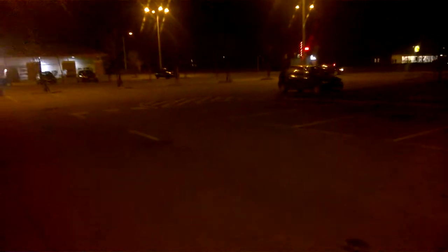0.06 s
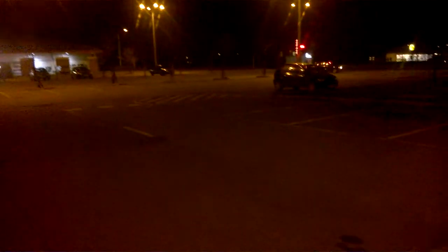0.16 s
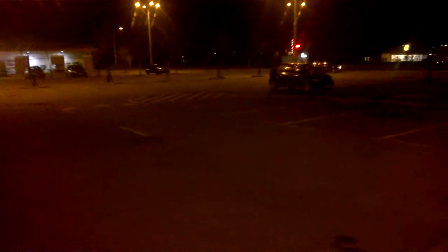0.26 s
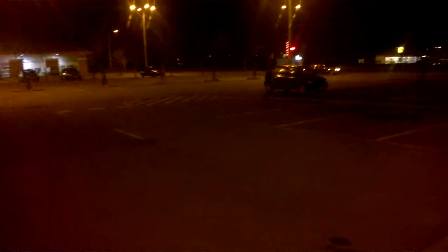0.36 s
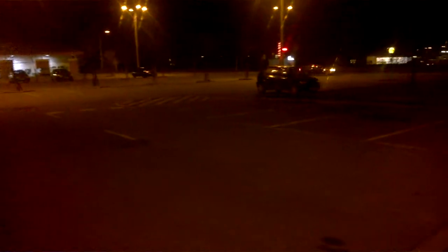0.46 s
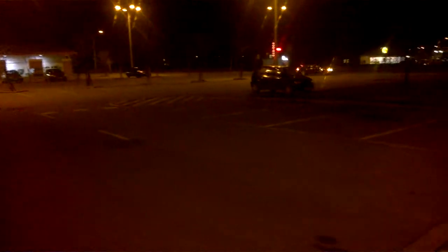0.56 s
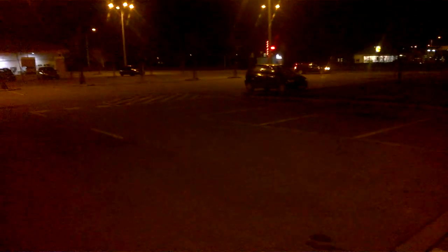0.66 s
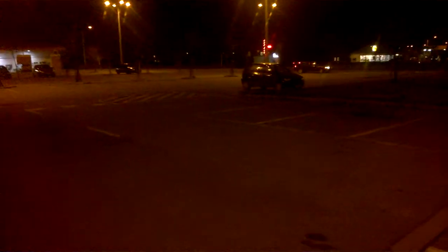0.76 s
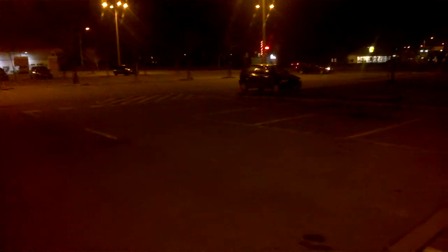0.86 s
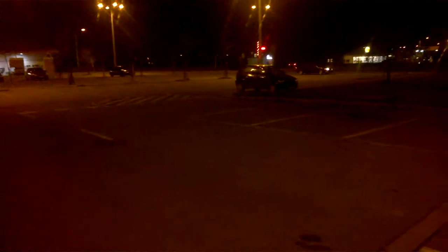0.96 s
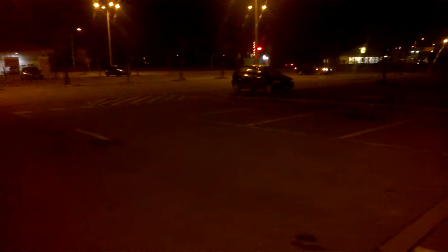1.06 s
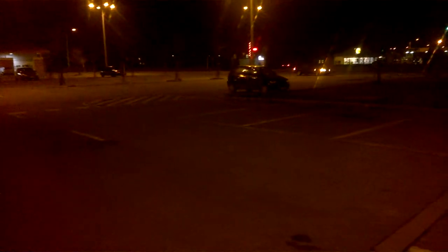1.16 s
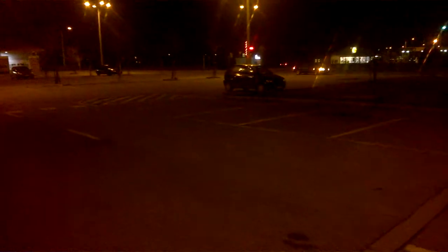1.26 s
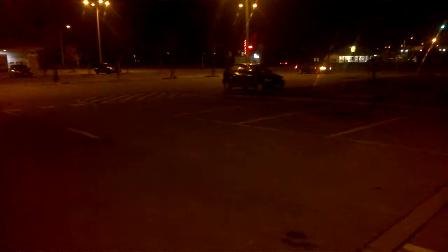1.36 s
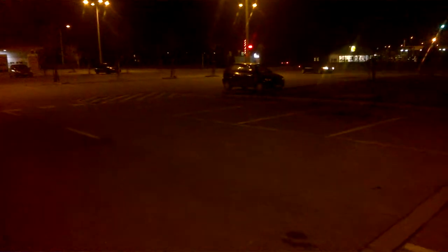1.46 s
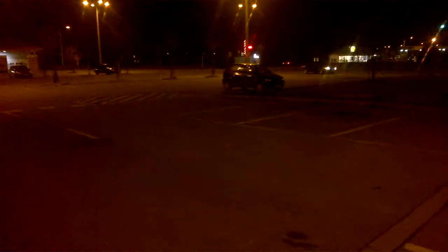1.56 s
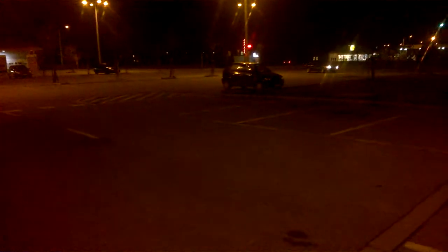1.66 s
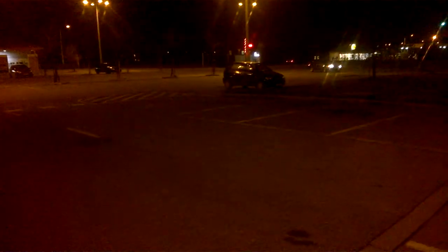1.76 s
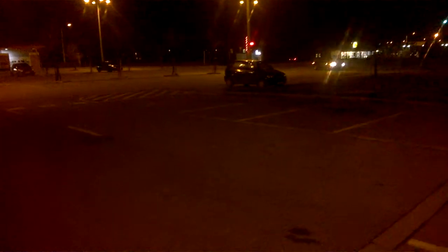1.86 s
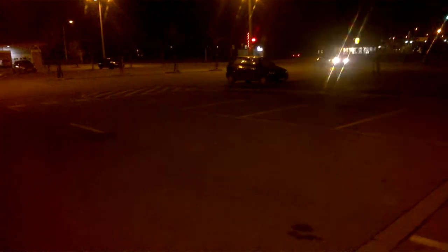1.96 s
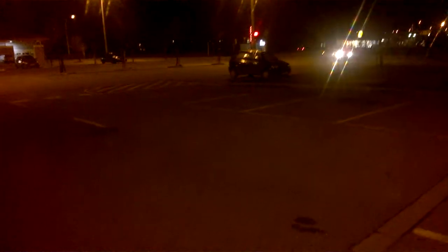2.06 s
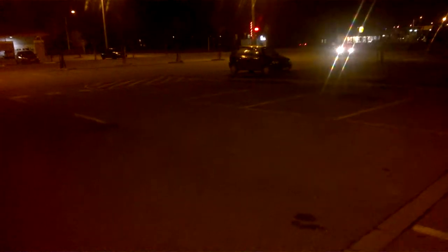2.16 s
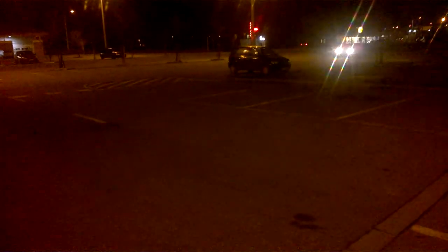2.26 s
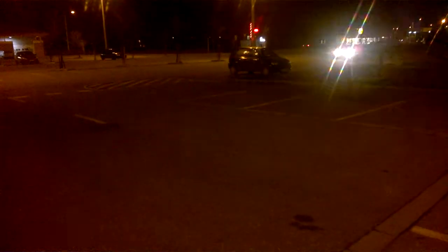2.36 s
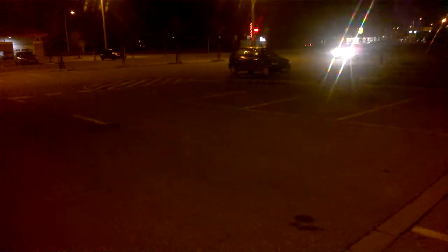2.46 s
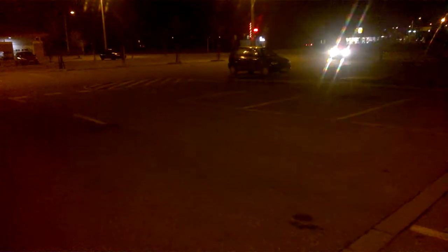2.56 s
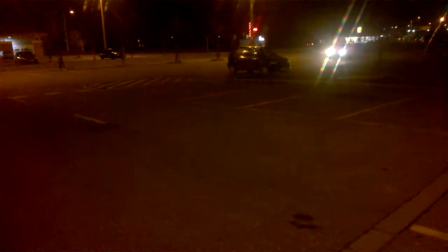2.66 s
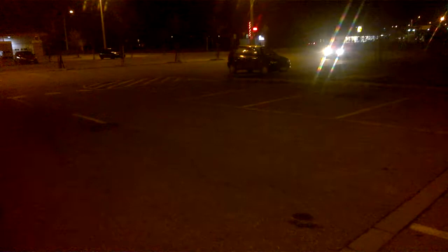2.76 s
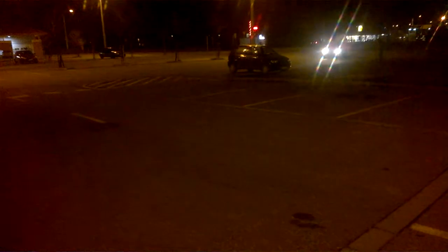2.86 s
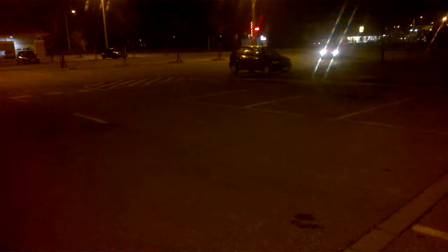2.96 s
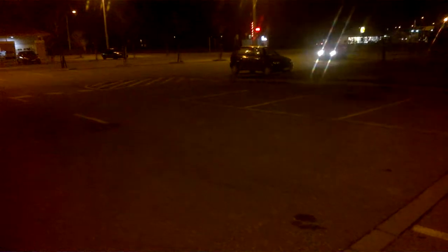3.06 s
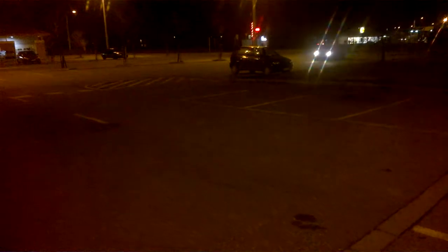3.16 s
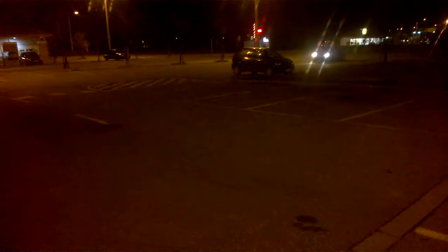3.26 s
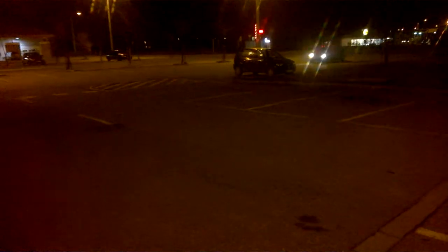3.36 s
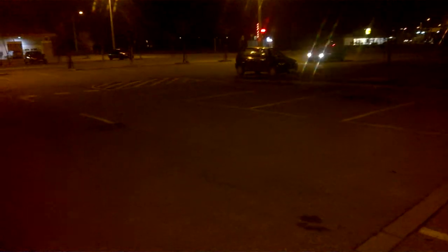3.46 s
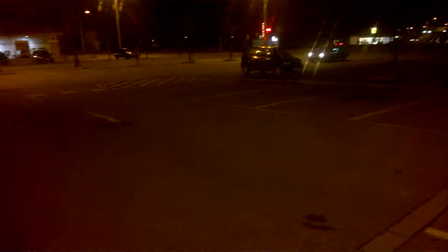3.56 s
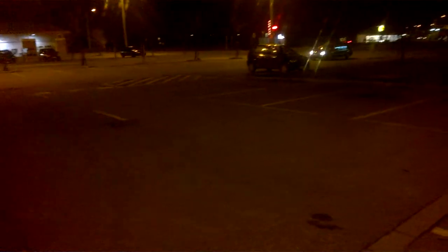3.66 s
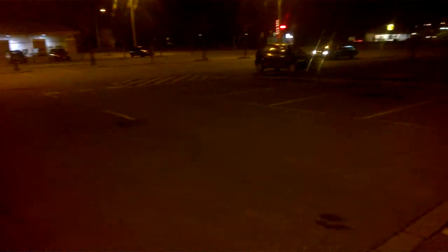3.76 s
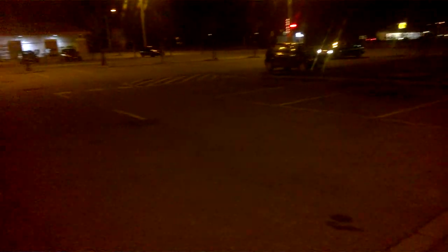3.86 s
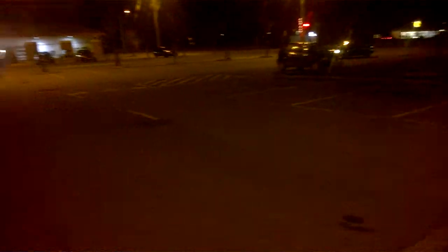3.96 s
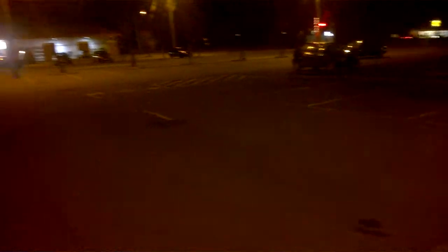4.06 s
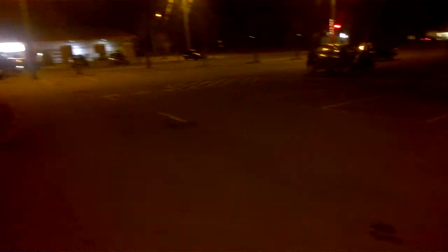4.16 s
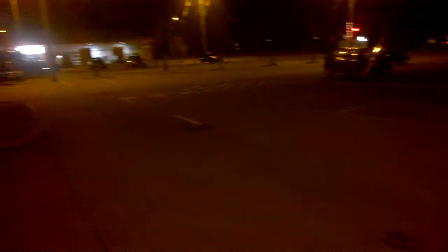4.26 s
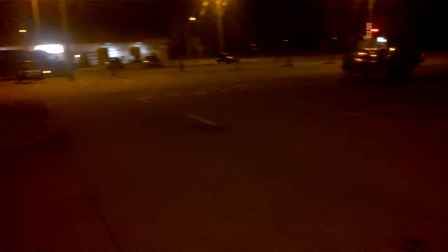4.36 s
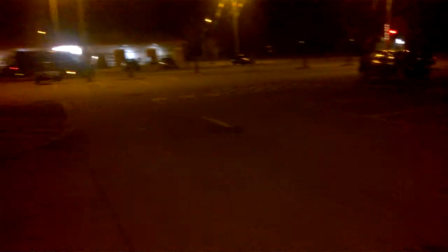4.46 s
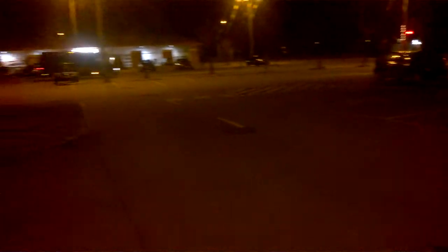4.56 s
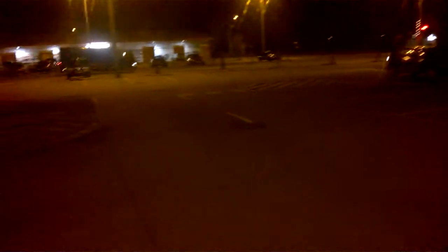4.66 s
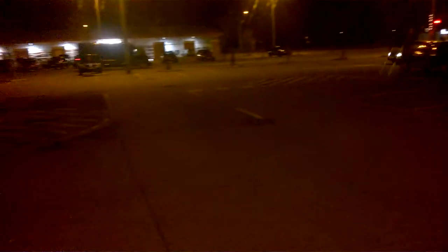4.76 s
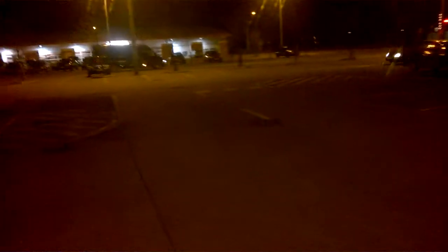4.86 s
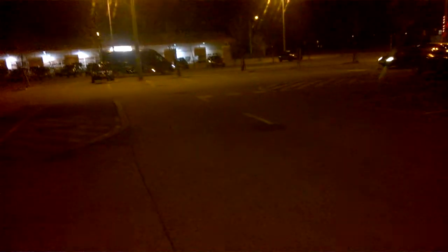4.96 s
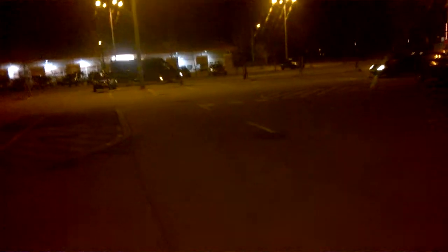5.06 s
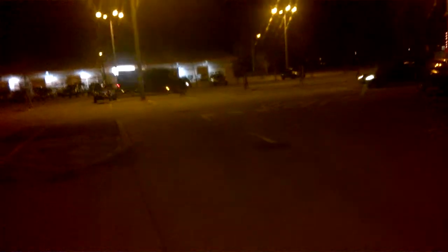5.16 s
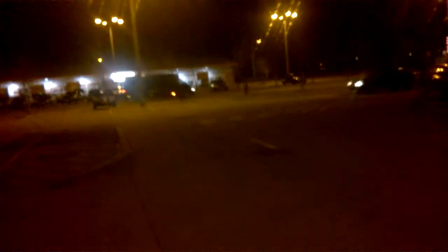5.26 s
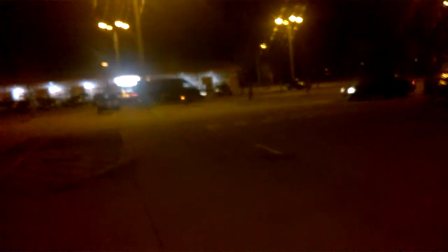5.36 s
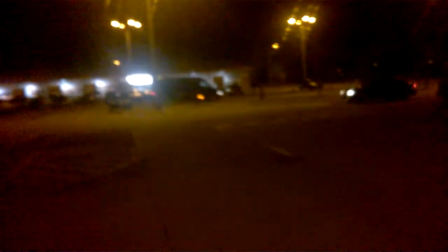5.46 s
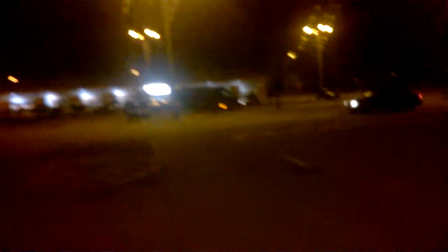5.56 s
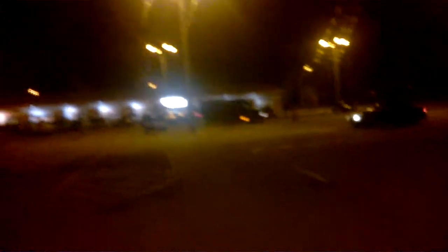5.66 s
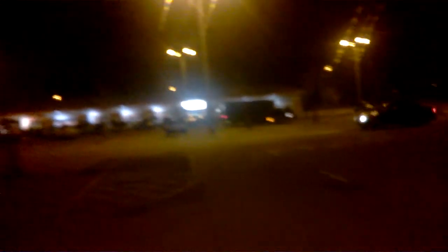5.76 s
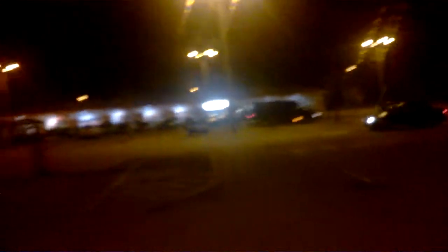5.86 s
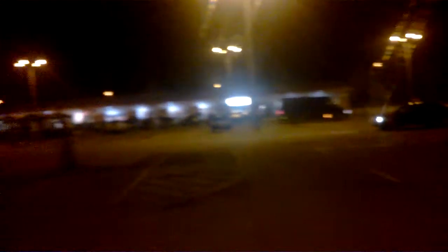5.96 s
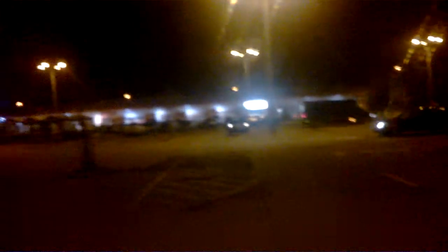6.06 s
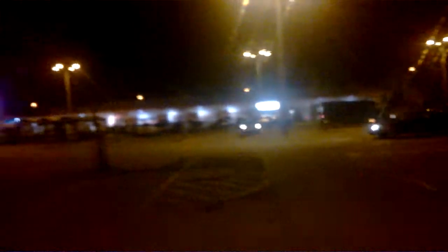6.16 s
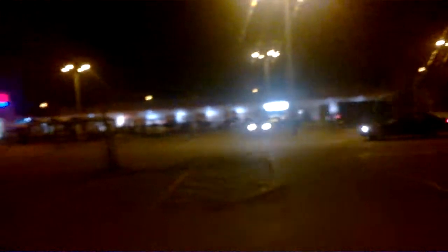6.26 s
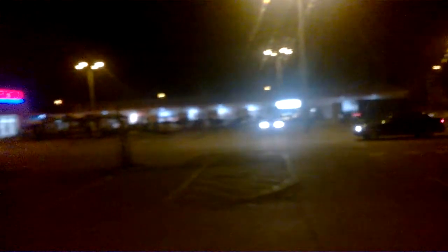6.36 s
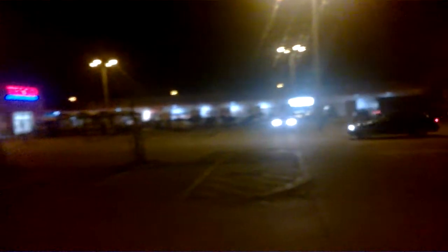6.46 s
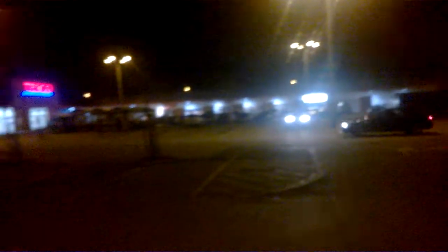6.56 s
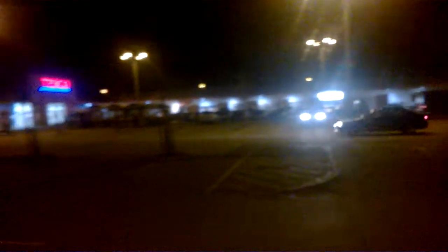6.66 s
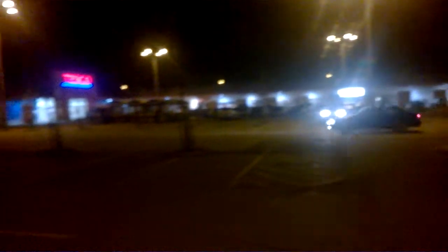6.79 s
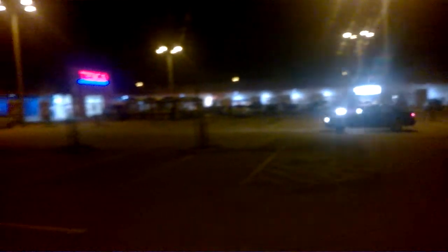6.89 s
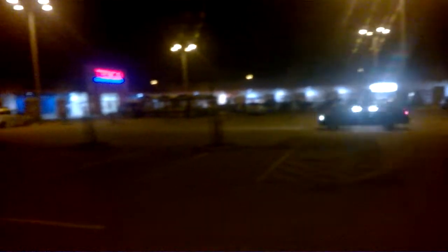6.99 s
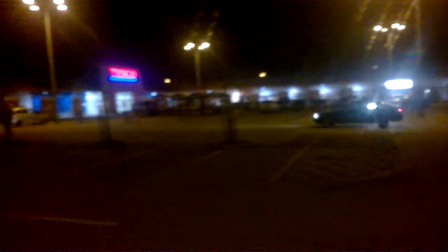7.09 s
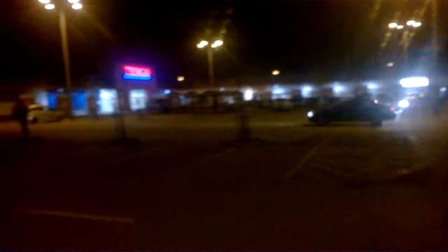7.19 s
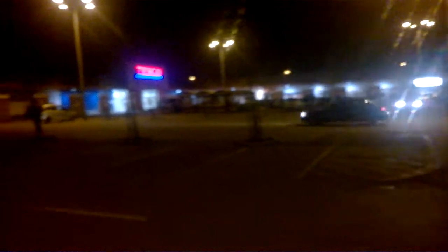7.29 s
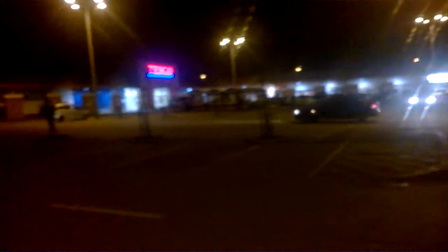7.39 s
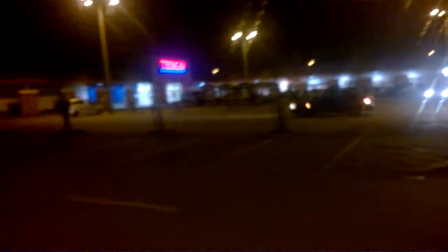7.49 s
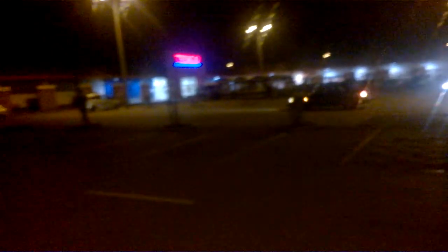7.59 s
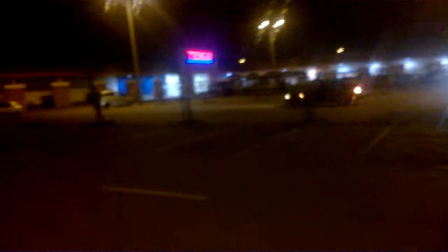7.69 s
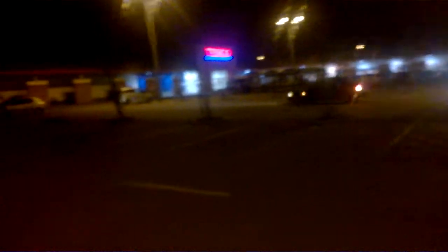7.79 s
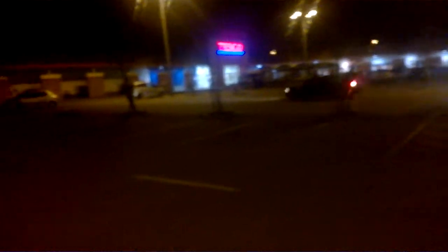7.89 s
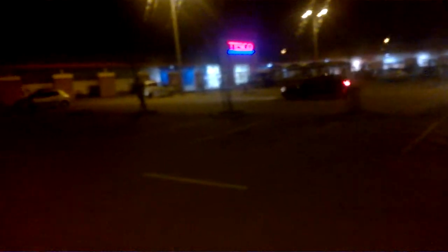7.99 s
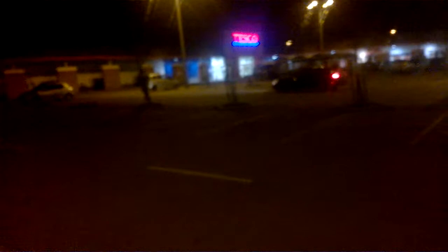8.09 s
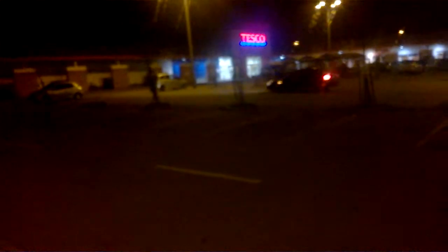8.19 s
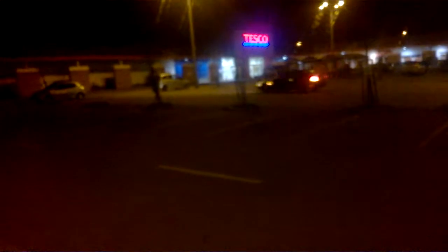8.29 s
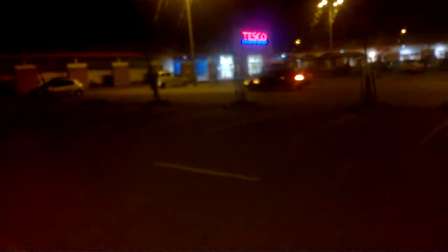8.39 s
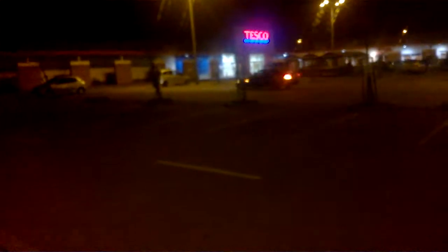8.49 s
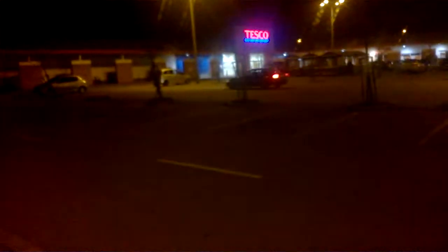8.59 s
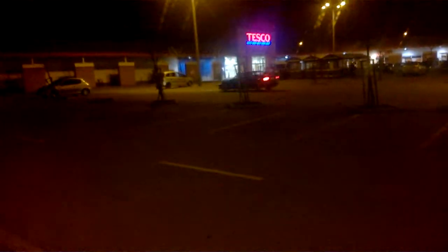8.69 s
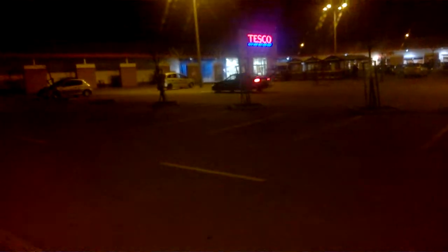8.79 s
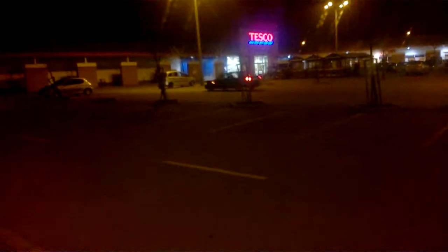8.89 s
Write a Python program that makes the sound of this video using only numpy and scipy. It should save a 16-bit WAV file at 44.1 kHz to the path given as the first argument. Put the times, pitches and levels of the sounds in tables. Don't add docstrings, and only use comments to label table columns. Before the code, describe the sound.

A quiet, open car park at night, heard through a small microphone with little deep bass and faint hiss. From 0 s a car with a loud four-cylinder exhaust rolls along at a low, uneven burble over soft tyre noise. Around 1.6 s it pulls briefly, the note rising until about 2 s, with sharp grit ticks near 1.75 s; then it lifts off and the exhaust nearly vanishes by 3 s, leaving tyres and a rough low hum of distant engines. At 3.4 s it surges again with a small jolt, wavers, and from about 4.5 s climbs steadily into a loud, resonant growl, passing near and peaking around 6.3 to 6.6 s. The pitch then falls fast as it coasts, the exhaust gone by 8 s. Tyres swish brightly over a damp patch from 7.5 to 8.3 s, then rolling hiss continues to 8.9 s with another faint, wavering engine hum far off.

```python
import sys
import numpy as np
from scipy import signal
from scipy.io import wavfile

SR = 44100
rng = np.random.default_rng(int(sys.argv[2]) if len(sys.argv) > 2 else 0)


def decibels_to_gain(level_db):
    exponent = np.asarray(level_db, float) / 20
    return 10 ** exponent


def put_to_file(sound):
    columns = np.atleast_2d(sound).T
    safe = np.clip(columns, -1, 1)
    whole_steps = np.round(safe * 32767)
    wavfile.write(sys.argv[1], SR, whole_steps.astype(np.int16))


N = 393813
TIME_S = np.arange(N) / SR

# time in seconds [s], firing pitch in hertz [Hz], level in dB [dB].
FAR_HUM = [(2.2, 64.36, -50.5), (3.34, 64.8, -58), (3.42, 67.2, -57), (3.47, 68.5, -51), (3.77, 67.95, -54),
           (3.81, 67.5, -45), (3.99, 70.1, -53), (4.02, 70.84, -46), (4.4, 67.6, -43.5)]
# order [multiple of pitch], relative level in dB [dB].
FAR_HUM_ORDERS = [(1, 3.5), (1.5, -8.5), (2, -12.5)]
# time in seconds [s], firing pitch in hertz [Hz], level in dB [dB].
LATE_HUM = [(8.05, 92.3, -60), (8.088, 92.2, -42), (8.348, 89.23, -48.5), (8.55, 96.5, -47.5),
            (8.606, 96.9, -56.5), (8.802, 93.7, -46), (8.93, 94.3, -57)]
# order [multiple of pitch], relative level in dB [dB].
LATE_HUM_ORDERS = [(.6, -2), (.75, -7.5), (1.0, -1), (1.5, -10), (2.0, -19.5)]

# frequency in hertz [Hz], density in dB per hertz [dB/Hz].
FAR_ROAD_COLOUR = [(12, -40), (20, -10), (53, -6.5), (81, -0.5), (149, -15.5), (184, -17.5), (268, -18.5),
                   (540, -24.5), (651, -24.5), (902, -29.5), (1820, -21.5), (2190, -25), (2520, -27),
                   (3930, -37.5), (5330, -52), (6930, -82.5), (11700, -120)]
# frequency in hertz [Hz], density in dB per hertz [dB/Hz].
NEAR_ROAD_COLOUR = [(160, -36), (280, -6), (291, -3.5), (337, -1.5), (405, -10), (476, -3.5), (532, -9.5),
                    (632, -15.5), (1070, -1), (1480, -10), (1990, -6), (2480, -12.5), (2840, -22.5),
                    (4010, -17.5), (5330, -42.5), (6930, -62.5), (11700, -120)]
# frequency in hertz [Hz], density in dB per hertz [dB/Hz].
SPRAY_DENSITY = [(4650, 2), (5700, -5.5), (6500, -11), (7500, -15.5), (9000, -25.5)]
ROAD_EDGES_HZ = [18, 300, 750, 1350, 2700, 4650, 5700, 9000]
# level in dB [dB], share of tyres, of heading, of exhaust loudness [dB per dB],
# gain when near in dB [dB].
ROAD_LAYERS = [
    (-44, 0.01, 0.01, 0.28, 3.7),
    (-59, 0.088, 0.011, 0.25, 5),
    (-65.5, 0.092, .01, .01, 16),
    (-55, 0.94, .01, .01, -1.27),
    (-60.5, 0.63, 1, 0.0088, 0.4),
    (-81, .6, .4, .01, -2.3),
    (-84, 1, 0.29, .01, -3),
]
# time in seconds [s], nearness [0-1], cancelled frequency in hertz [Hz],
# dip depth in dB [dB].
GROUND_ECHO = [(0, 0, 3030, 18), (1.07, -.1, 3020, 15.5), (1.75, 0.24, 2750, 4), (2.4, 0.29, 2560, 10),
               (2.95, 0.31, 2310, 8), (3.7, 0.21, 2500, 8), (3.9, 0.18, 3300, -0.5), (4.4, .3, 4000, -0.5),
               (5.1, 0.5, 4847, 0.5), (5.6, 0.94, 4910, 13), (5.7, 0.86, 2890, -2), (6.05, 1.03, 2994, -2),
               (6.4, .99, 3060, -1), (6.6, .8, 3110, -0.5), (7.2, 0.82, 2730, 4.5), (7.7, 0.81, 3500, 4),
               (8.4, 0.61, 3585, 6), (8.93, 0.37, 3600, 8)]
# time in seconds [s], level in dB [dB].
ROLLING = [(0.04, -55), (.5, -56), (.65, -60.5), (1.07, -60.5), (1.5, -57.5), (1.77, -55), (2.5, -54),
           (2.9, -56), (3.25, -55), (3.7, -56.5), (4.36, -53.5), (5.12, -50.5), (5.6, -49.5), (6.36, -48.5),
           (7.15, -51.5), (7.8, -45), (8.3, -46), (8.9, -47.5)]
# time in seconds [s], gain in dB [dB].
CAR_HEADING = [(0, -1), (1.3, 0.5), (1.8, -3.5), (2.0, -5.5), (2.35, -7), (2.5, -12.5), (2.9, -1),
               (3.3, 0.5), (3.7, -2), (5.1, 2), (5.6, -1), (6.5, -2.5), (7.1, -5.5), (7.6, -1), (7.9, -3.5),
               (8.9, -3.5)]
# time in seconds [s], half-width in seconds [s],
# gain in dB [dB].
PASSING_SHADES = [(1.05, .05, -4), (2.28, .03, -2), (2.47, .04, -3), (2.78, 0.059, -4), (3.3, .03, -5),
                  (3.81, 0.037, -6), (4.08, 0.025, 1), (7.15, 0.051, 0.5), (8.0, .04, -2)]
# time in seconds [s], peak in dB [dB].
GRIT_TICKS = [
    (1.497, -66),
    (1.742, -55),
    (1.748, -54),
    (1.765, -71),
    (3.53, -66),
    (5.348, -58),
    (6.361, -61),
]

# time in seconds [s], firing rate in firings per second [1/s].
FIRING_RATE = [(0.0, 42.5), (0.2, 41.0), (0.6, 42.4), (1.3, 44.4), (1.6, 49.7), (2.0, 58.3), (2.4, 55.3),
               (2.7, 49.5), (3.2, 47.5), (3.7, 51.5), (4.1, 53.5), (4.5, 59.3), (5.0, 66.7), (5.5, 73.9),
               (6.55, 88.1), (6.8, 82.4), (7.3, 65.8), (8.0, 35.3)]
# time in seconds [s], half-width in seconds [s],
# rate change in firings per second [1/s].
DRIVELINE_JOLTS = [(0, .06, 1.24), (.3, 0.057, 0.9), (1.8, .1, 1.42), (2.2, 0.066, -0.6), (2.9, .07, -1),
                   (3.1, 0.075, 1), (3.4, 0.072, 3.5), (3.52, 0.07, -3), (3.75, 0.11, 0.15),
                   (4.02, 0.063, -1.6), (4.2, 0.069, 2), (4.32, .05, -1.5), (4.6, 0.043, -1),
                   (4.71, 0.053, 1.14), (5.1, 0.046, -0.52)]
# time in seconds [s], pulse strength in dB [dB], softness in dB per octave [dB/oct].
THROTTLE_CURVE = [(0.0, -46.5, 4.5), (1.19, -43.4, 9), (1.46, -45.5, -0.1), (1.65, -37.5, 5.5),
                  (2.13, -44.5, 4), (2.61, -55, 13.5), (3.19, -65.5, 3), (3.46, -39, 11),
                  (4.33, -51.5, -1.2), (4.86, -30.5, 8), (5.46, -34, 4.5), (6.08, -36.5, 3),
                  (6.26, -24, 7.5), (6.56, -31.5, 4), (6.75, -35.5, 20), (7.56, -28, 18.5), (7.9, -44, 5.5),
                  (8.01, -47, 17)]
# time in seconds [s], half-width in seconds [s], gain in dB
# [dB].
THROTTLE_BLIPS = [(.12, 0.075, -7), (.55, 0.093, 1), (1.1, 0.047, 0), (1.9, 0.032, 0.5), (2.0, 0.037, -2.5),
                  (2.85, 0.1, 6.5), (3.6, 0.057, 0), (3.9, 0.078, 2.5), (4.1, .05, 1.5), (4.62, 0.038, -1),
                  (6.0, .04, 2), (6.27, 0.036, -2), (6.62, 0.048, 2.5), (7.7, .05, -6.5)]
# firing order [multiple], relative level in dB [dB].
PULSE_ORDERS = [(1, 0), (2, 8.5), (3, 12.5), (4, 10.5), (5, 10), (6, .5), (7, -2.5), (8, -11)]
# half order [multiple], relative level in dB [dB].
HALF_ORDERS = [(.5, -13.5), (1.5, 1.5), (2.5, -22.5)]
# time in seconds [s], half-width in seconds [s], extra unevenness in dB [dB].
LUMPY_RUNNING = [(0.0, .1, 15.5), (1.75, 0.2, 19.5), (2.97, .1, 25), (3.5, .1, 16), (4.05, 0.043, 16),
                 (6.0, .15, 6.5), (6.92, 0.21, 20.5), (7.5, 0.11, 5), (7.85, 0.11, 30)]
# centre in hertz [Hz], width in hertz [Hz], gain in dB [dB].
PIPE_RESONANCES = [(58.4, 66, -11.5), (85.8, 19.8, 6), (113.3, 24.4, 5.5), (137.8, 21.2, 1.3),
                   (153, 8, -17), (191.8, 17, -11), (206.4, 37, -11.5), (235.1, 27, -10),
                   (284.6, 7.2, -22.5), (327.3, 25, -17.5), (366.6, 47.5, -15), (459.6, 20.4, -8),
                   (484.7, 33, -6), (562, 30, -16)]
# time in seconds [s], half-width in seconds [s], firing order
# [multiple], gain in dB [dB].
ORDER_SWELLS = [(1.8, .04, 1, -16), (4.2, .2, 1, 6), (4.599, .05, 1, -11), (5.28, .07, 1, 2),
                (5.4, .04, 1, -2), (5.66, .06, 1, -8.5), (5.86, .07, 1, 4), (6.02, .05, 1, -4),
                (6.74, .06, 1, -6.5), (6.9, .06, 1, 1.5), (7.2, .08, 1, -0.5), (5.65, 0.17, 2, 4.5),
                (5.9, 0.035, 2, -3.5), (6.401, 0.044, 2, -7), (6.6, 0.075, 2, -0.5), (7.0, 0.14, 2, -10),
                (.5, 0.13, 3, 2), (1.95, 0.1, 3, -6), (3.55, 0.11, 3, 2.5), (4.02, 0.043, 3, 3.5),
                (5.599, 0.21, 3, -2.5), (6.1, 0.059, 3, 3), (7.501, .12, 3, -6), (7.8, 0.05, 3, 6.5),
                (1.65, 0.11, 4, -4), (5.2, .2, 4, -5.5), (5.15, 0.2, 5, -6), (1.52, 0.17, 6, 18),
                (2.1, 0.16, 6, 11), (7.85, .08, 8, 12)]
# time in seconds [s], depth in dB [dB].
WEAK_FIRINGS = [(0.736, 6), (1.085, 8), (1.148, 13), (1.778, 12), (2.22, 12.5), (2.369, 9), (2.672, 4),
                (2.73, 13), (3.123, 8), (3.847, 10), (4.095, 6), (4.368, 6), (7.17, 9), (8.022, -1),
                (8.614, 11), (8.914, 2)]

STUMBLE_HALF_WIDTH_S = 0.016
UNEVEN_DB = -29
MEAN_TYRES_DB, MEAN_EXHAUST_DB, QUIET_EXHAUST_DB = -55, -33, -45
SWISH_DB, SPRAY_DB = 12, 1.5
SELF_NOISE_DB = -91.5


def rms_one(x):
    return x / np.sqrt(np.mean(x ** 2) + 1e-20)


def in_time(rows):
    s, *columns = np.transpose(rows)
    return [np.interp(TIME_S, s, column) for column in columns]


def at_hz(points, hz):
    table_hz, table_db = np.transpose(points)
    return np.interp(np.log(hz), np.log(table_hz), table_db)


def sounding(rows, fade_s):
    start, end = rows[0][0], rows[-1][0]
    return np.interp(TIME_S, [start - fade_s, start, end, end + fade_s], [0, 1, 1, 0])


def bells(rows):
    return sum(height * np.exp(-((TIME_S - s) / width_s) ** 2) for s, width_s, height in rows)


def drift(rate_hz):
    pole = np.exp(-80 * np.pi * rate_hz / SR)
    noise = rng.standard_normal(N // 40 + 2002)
    slow = signal.lfilter([1], [1, -2 * pole, pole * pole], noise)[2000:]
    return np.interp(np.arange(N) / 40, np.arange(len(slow)), rms_one(slow))


def band(x, low_hz, high_hz, order=2):
    return signal.sosfilt(signal.butter(order, [low_hz, high_hz], "band", fs=SR, output="sos"), x)


def partial(cycles, order, level_db, flutter_db, wander_rad):
    phase = 2 * np.pi * (order * cycles + rng.random()) + wander_rad * drift(21)
    return np.sqrt(2) * decibels_to_gain(level_db + flutter_db * drift(13.6)) * np.sin(phase)


def stumble_db():
    return -bells([(s, STUMBLE_HALF_WIDTH_S, depth_db) for s, depth_db in WEAK_FIRINGS])


def far_engine():
    out = 0
    for rows, orders in ((FAR_HUM, FAR_HUM_ORDERS), (LATE_HUM, LATE_HUM_ORDERS)):
        hz, level_db = in_time(rows)
        cycles = np.cumsum(hz) / SR
        hum = 0
        for order, db in orders:
            hum = hum + partial(cycles, order, level_db + db, flutter_db=4.5, wander_rad=0.26)
        out = out + hum * sounding(rows, fade_s=0.08)
    return out


def layer_levels(exhaust_db, near):
    (tyres_db,), (heading_db,) = in_time(ROLLING), in_time(CAR_HEADING)
    tyres_db = tyres_db - MEAN_TYRES_DB
    heading_db = heading_db + bells(PASSING_SHADES)
    exhaust_db = exhaust_db - MEAN_EXHAUST_DB
    levels = []
    for db, by_tyres, by_heading, by_exhaust, near_db in ROAD_LAYERS:
        car_db = by_tyres * tyres_db + by_heading * heading_db + by_exhaust * exhaust_db
        levels.append(db + car_db + near_db * near)
    wet = np.interp(TIME_S, [7.42, 7.6, 8.27, 8.38], [0, 1, 1, 0])
    rumble, *middle, swish, spray = levels
    return [rumble + stumble_db(), *middle, swish + SWISH_DB * wet, spray + SPRAY_DB * wet]


def band_gain(hz, layer_low_hz, near, dip_hz, dip_db):
    if layer_low_hz < 4500:
        share = np.clip(near, 0, 1) * (layer_low_hz > 200)
        colour_db = (1 - share) * at_hz(FAR_ROAD_COLOUR, hz) + share * at_hz(NEAR_ROAD_COLOUR, hz)
    else:
        colour_db = at_hz(SPRAY_DENSITY, hz)
    notch = np.exp(-(np.log(hz / dip_hz) / 0.11) ** 2)
    return decibels_to_gain(colour_db - dip_db * notch)


def road(cycles, exhaust_db):
    near, dip_hz, dip_db = in_time(GROUND_ECHO)
    white, together = rng.standard_normal((2, N)), drift(9.9)
    puff = 1 + 0.069 * np.sin(2 * np.pi * cycles)
    out, turn = 0, 0
    levels = layer_levels(exhaust_db, near)
    for low, high, level_db in zip(ROAD_EDGES_HZ, ROAD_EDGES_HZ[1:], levels):
        per_octave = 3 if low < 500 else 7
        edges = np.geomspace(low, high, 2 + int(per_octave * np.log2(high / low)))
        layer, power = 0, 0
        for a, b in zip(edges, edges[1:]):
            turn = 1 - turn
            gain = band_gain(np.sqrt(a * b), low, near, dip_hz, dip_db)
            power = power + gain ** 2 * (b - a) / (SR / 2)
            patchy = decibels_to_gain(0.45 * together + 1.15 * drift(7.5))
            layer = layer + gain * patchy * band(white[turn], a, b, order=2 if low < 2000 else 3)
        out = out + decibels_to_gain(level_db) * layer / np.sqrt(power) * (puff if low > 500 else 1)
    return out


def stones():
    hits = np.zeros(N)
    for s, db in GRIT_TICKS:
        hits[round(s * SR)] = decibels_to_gain(db)
    fall = np.exp(-1 / (0.005 * SR))
    burst = signal.lfilter([1], [1, -fall], hits + 1e-18) * rng.standard_normal(N)
    return 3 * band(burst, 3000, 5200, order=3)


def pipe_db(hz):
    power = 0
    for top_hz, width_hz, db in PIPE_RESONANCES:
        power = power + decibels_to_gain(2 * db) / (1 + (2 * (hz - top_hz) / width_hz) ** 4)
    return 10 * np.log10(power)


def exhaust():
    (per_s,), (strength_db, softness) = in_time(FIRING_RATE), in_time(THROTTLE_CURVE)
    per_s = per_s + bells(DRIVELINE_JOLTS)
    strength_db = strength_db + bells(THROTTLE_BLIPS)
    cycles, out, power = np.cumsum(per_s) / SR, 0, 0
    for order, db in PULSE_ORDERS:
        level_db = strength_db + db - softness * np.log2(order) + pipe_db(order * per_s)
        swells = [(s, width_s, gain_db) for s, width_s, k, gain_db in ORDER_SWELLS if round(k) == order]
        level_db = level_db + bells(swells)
        power = power + decibels_to_gain(2 * level_db)
        flutter_db, wander_rad = (1.27, 0.079) if order < 4 else (1.7, 0.1)
        out = out + partial(cycles, order, level_db, flutter_db, wander_rad)
    uneven_db = strength_db + UNEVEN_DB + bells(LUMPY_RUNNING) + pipe_db(3 / 2 * per_s)
    for order, db in HALF_ORDERS:
        out = out + partial(cycles, order, uneven_db + db, flutter_db=2.5, wander_rad=0.4)
    heard = sounding(THROTTLE_CURVE, fade_s=0.03)
    loudness_db = 10 * np.log10(power * heard ** 2 + decibels_to_gain(2 * QUIET_EXHAUST_DB))
    return out * heard, cycles, loudness_db


def scene():
    note, cycles, exhaust_db = exhaust()
    engines = decibels_to_gain(stumble_db()) * (note + far_engine())
    return (engines + road(cycles, exhaust_db) + stones())[None, :]


def top_cut(x):
    return signal.sosfilt(signal.butter(12, 15750, fs=SR, output="sos"), x)


def record(dry):
    high_pass = signal.butter(2, 36, "high", fs=SR, output="sos")
    led_in = np.hstack([dry[:, 2000:0:-1], dry])
    heard = signal.sosfilt(high_pass, led_in)[:, 2000:]
    hiss = decibels_to_gain(SELF_NOISE_DB) * rms_one(band(rng.standard_normal(N), 6000, 18000))
    return top_cut(heard + hiss)


dry = scene()
out = record(dry)
put_to_file(out)
```